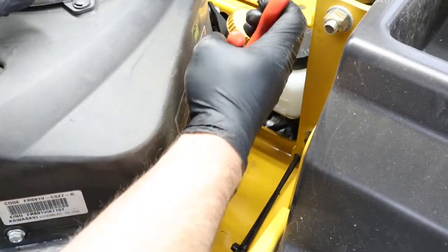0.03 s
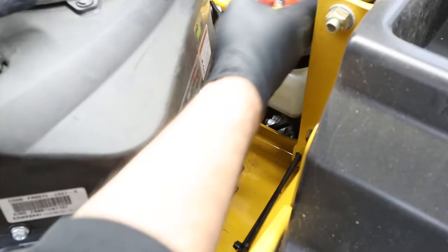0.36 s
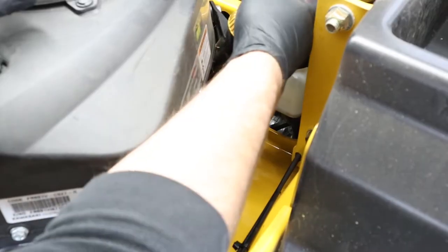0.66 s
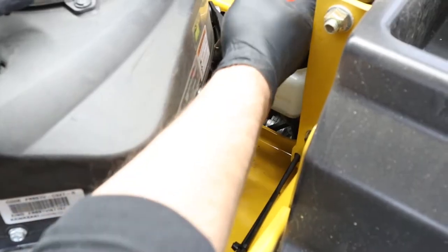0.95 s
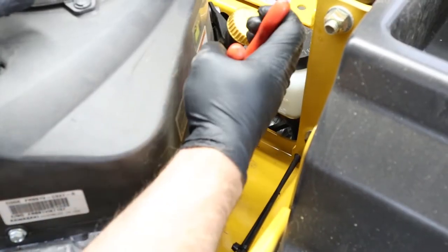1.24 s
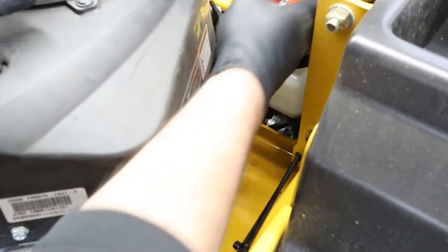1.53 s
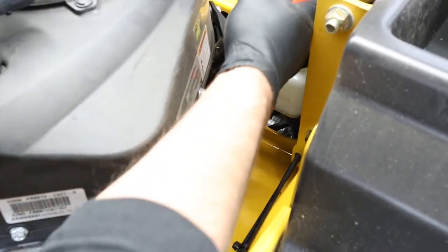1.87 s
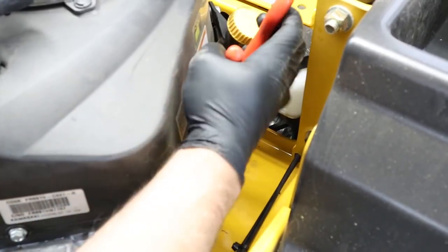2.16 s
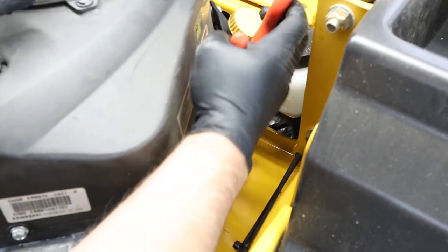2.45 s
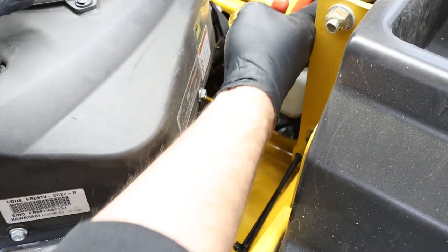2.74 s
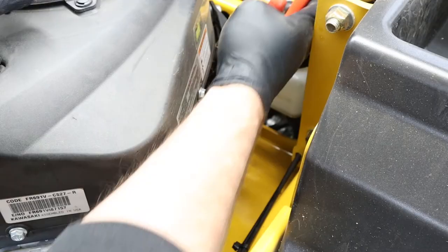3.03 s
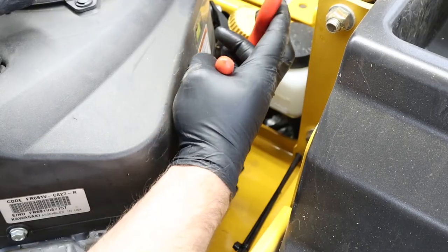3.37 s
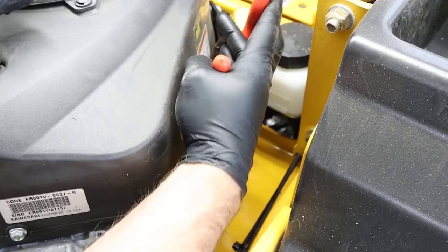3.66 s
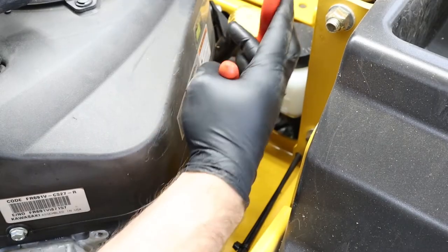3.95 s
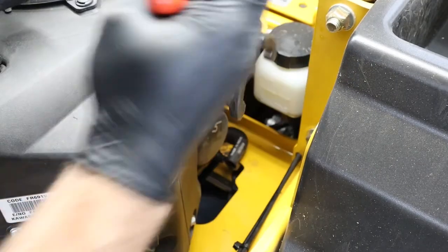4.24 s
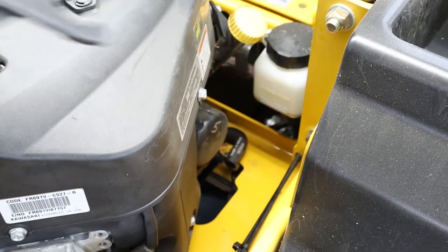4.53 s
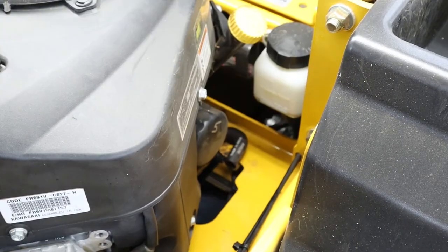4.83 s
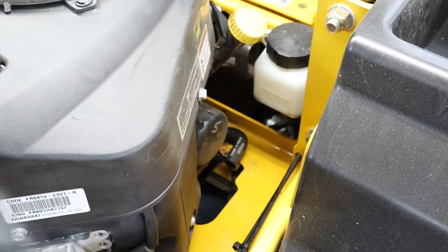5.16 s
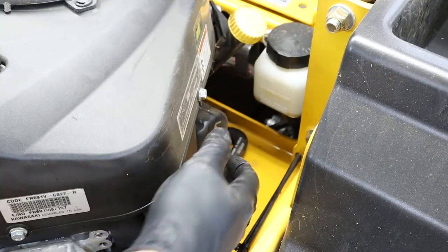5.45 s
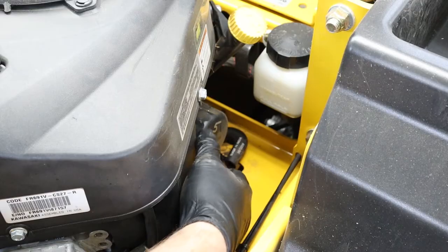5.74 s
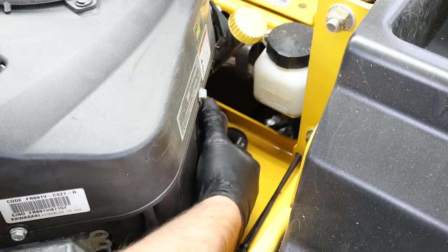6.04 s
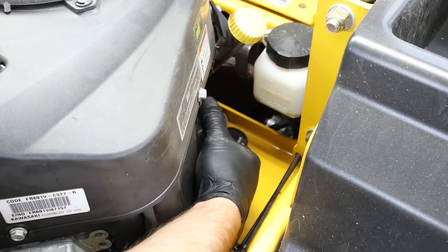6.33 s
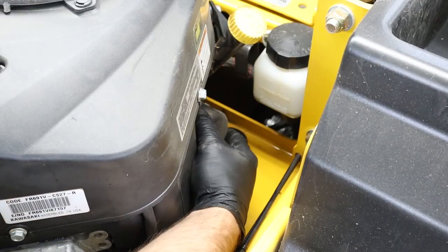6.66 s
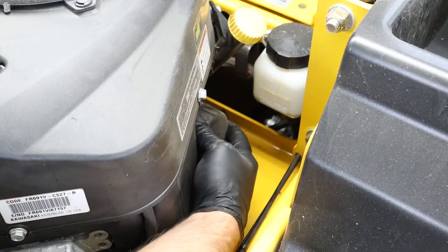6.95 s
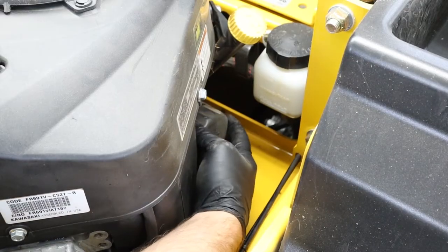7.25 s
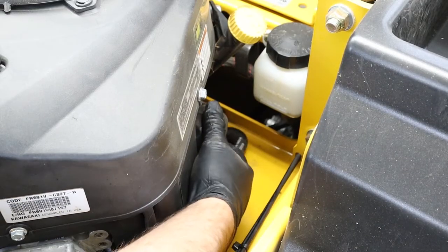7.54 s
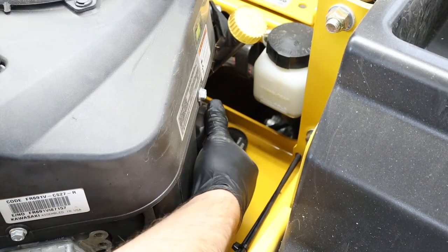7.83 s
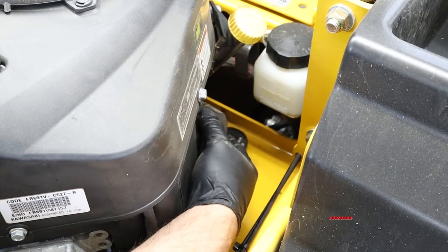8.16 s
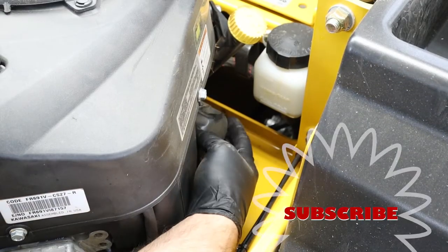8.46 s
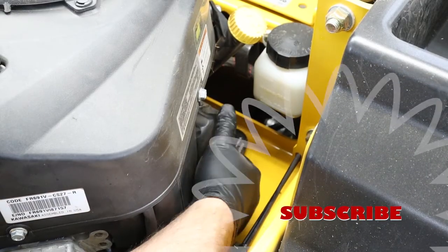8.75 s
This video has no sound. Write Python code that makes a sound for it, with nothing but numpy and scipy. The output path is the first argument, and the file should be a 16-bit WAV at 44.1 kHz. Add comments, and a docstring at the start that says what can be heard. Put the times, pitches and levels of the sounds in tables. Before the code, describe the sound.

Short metal squeaks and dull knocks of pliers loosening an oil filter, followed by a sharp clink and a distant crash.

```python
"""Oil filter pliers work a filter loose deep in an engine bay. For the first 3 s the jaws squeal on the
can by stick-slip, knock as they let go, and the can rubs round on its seal. From 4 s a gloved hand
brushes the parts and turns the filter on; near 5 s the pliers are put down with a clink. Near 7 s
something topples and crashes farther off in the workshop. Room air and a faint fan run throughout."""
import sys
import numpy as np
from scipy import signal
from scipy.fft import rfft, irfft, next_fast_len
from scipy.io import wavfile

SR = 44100
rng = np.random.default_rng(int(sys.argv[2]) if len(sys.argv) > 2 else 0)


def dump(signal):
    """Clip the signal to [-1, 1] and save it as 16-bit WAV at the path in sys.argv[1]."""
    limited = np.clip(np.atleast_2d(signal).T, -1, 1)
    pcm = np.round(limited * 32767).astype(np.int16)
    wavfile.write(sys.argv[1], SR, pcm)


N = 396589
TIME_S = np.arange(N) / SR
CUTOFF_HZ = 15800

# Jaw slips. Each row: start and length in seconds, first and last pitch in Hz, bend (above 0 glides
# early, below 0 late), mid-slip level in dB, swell in dB, octave over fundamental in dB, rasp 0-1.
JAW_SLIPS = [(0, .06, 4643, 5514, -0.1, -67, -3, -14.5, 0.23),
             (0.013, 0.0627, 3926, 4806, -2, -62.5, -3.5, -18, 0.68),
             (1.122, 0.052, 3523, 5050, -1.1, -63.5, 8.5, -13.5, 0.42),
             (1.173, 0.0624, 2695, 2118, 7, -38, 5, -14, .39),
             (2.059, 0.0222, 3300, 3800, -1.24, -68, 6.5, -12.5, 0.52),
             (2.081, .079, 1478, 1978, 0.3, -53, 1, 6, 0.74),
             (2.163, 0.0133, 2090, 2048, 1.5, -36.5, 0.5, -20, 0.19),
             (3.144, 0.0644, 1880, 3683, -1.19, -51, 2.5, -13.5, 0.66),
             (3.167, 0.0262, 3665, 3287, 3.5, -55, 0, -14, .7),
             (3.22, 0.0494, 4500, 5117, 6, -60.5, -14.5, -11, 0.49),
             (6.588, 0.0204, 3547, 5388, -1.5, -64, -2.5, -13, 0.85)]
# Knocks and taps on the filter. Each row: start in seconds, level in dB, pitch in Hz.
CAN_KNOCKS = [(.068, -40, 734.6), (.43, -44.5, 567), (.604, -52.5, 1546), (.607, -46, 187.6),
              (.944, -42, 272), (.963, -43, 340.5), (1.222, -33.5, 717), (1.569, -53.5, 1170),
              (1.599, -48, 542), (1.758, -52, 1267), (1.926, -61.5, 1830), (2.031, -57, 1330),
              (2.115, -50.5, 727), (2.163, -38.5, 606), (2.611, -48.5, 517), (2.657, -51.5, 797),
              (2.680, -42, 537.6), (2.713, -41.5, 550), (3.026, -64.5, 2320), (3.198, -53.5, 715),
              (3.995, -49, 1005), (4.268, -66, 2960), (5.629, -61.5, 900), (5.889, -56.5, 2930),
              (5.96, -54, 2700), (5.982, -58, 3600), (6.407, -64, 2140), (8.87, -52.5, 378)]
# Pliers touching metal. Each row: start in seconds, level in dB, tilt in dB per octave, low edge in Hz,
# crack in dB, free ring in dB, contact note in Hz, delay of the first bounce in seconds.
PLIERS_CLINKS = [(2.773, -44.5, 4, 298, -2.5, -17, 3135, .004),
                 (3.995, -49, -10, 430, -0.5, -19.5, 2267, .007),
                 (4.897, -40.5, 0, 900, -8.5, -20.5, 3106, .002),
                 (5.058, -26.5, 0, 700, -2, -4.5, 2191, .009)]
# Pulls of the can on its seal. Each row: start in seconds, length in seconds, level in dB.
SEAL_PULLS = [(0.372, .15, -59.5), (0.926, 0.063, -62), (1.563, 0.1087, -61), (2.107, 0.041, -62),
              (2.587, 0.034, -62), (2.71, 0.0847, -56.5), (3.183, 0.096, -63)]
# Glove brushes. Each row: centre in seconds, half length in seconds, level in dB.
GLOVE_BRUSHES = [(4.303, 0.035, -77.5), (4.525, 0.052, -77.5), (4.802, 0.152, -71.5), (5.063, 0.121, -67),
                 (5.491, .11, -77), (5.88, 0.205, -72.5), (7.564, 0.0703, -66), (8.2, 0.121, -75)]
# Hits of the falling object. Each row: start in seconds, level in dB, low edge in Hz, cut-off in Hz.
FALL_HITS = [(6.781, -40.5, 100.8, 1440), (6.896, -33, 909, 5700), (7.048, -32, 300, 900),
             (7.056, -24, 150, 12000), (7.073, -22.5, 90, 2200)]
# Modes of the pliers and the falling object. Each row: frequency in Hz, level in dB, T60 in seconds.
PLIERS_MODES = [(767, -13, 0.083), (1039, -19.5, 0.1), (1551, -19.5, .06), (2191, 2, 0.0937),
                (2190, -12.5, 0.029), (3155, -4, 0.18), (3180.8, 3.5, 0.076), (5137, -13.5, 0.039),
                (6232, -10, 0.055), (7480, 1, 0.0155), (8564, -1.5, 0.041), (9740, -12.5, 0.042)]
FALL_MODES = [(126, -26.5, 1), (173.86, -8, 1), (402.7, 9.5, 0.161), (574.2, -1, 0.59), (765, -6, 0.12),
              (880, -6.5, 0.8), (999, -8.5, 0.828), (1595.6, -1.5, 0.48), (2150.4, -1.5, 0.64),
              (2314, 2, 0.4), (2667, -15, 1), (2948, -12, .45)]
# Noise spectra of the sources. Each row: frequency in Hz, relative spectral density in dB.
GRIT_SPECTRUM = [(1200, -31), (2600, 3.5), (5000, -5), (15000, -17.5)]
CAN_SPECTRUM = [(40, -67), (70, -10), (130, -6), (400, -5), (600, -1), (1200, -7.5), (2500, -10.5),
                (6000, -13.5), (15000, -22.5)]
STEEL_SPECTRUM = [(200, -28.5), (600, -21), (1500, -9.5), (2200, 10.5), (3200, 2), (5000, 3), (9000, -10.5),
                  (12000, -10.5), (16000, -27)]
SEAL_SPECTRUM = [(100, -12.5), (230, -7), (350, 4), (550, 0.5), (800, -8.5), (1400, -12), (3000, -17.5),
                 (14000, -47)]
GLOVE_SPECTRUM = [(800, -25), (2500, 9.5), (5000, -4.5), (9000, -9.5), (16000, -16.5)]
CRASH_SPECTRUM = [(50, -37.5), (85, -38), (120, 13), (220, -0.5), (380, 2.5), (800, 5.5), (1800, 1),
                  (2700, 6), (4500, -4.5), (9000, -14), (15000, -30)]
AIR_SPECTRUM = [(20, -48), (45, -15.5), (72, 1), (110, -2.5), (240, -5), (400, -11), (700, -13),
                (1300, -18), (2100, -16), (2700, -21), (4000, -34.5), (8000, -41), (12000, -39),
                (16000, -59)]
# Workshop reverberation. Each row: frequency in Hz, T60 in seconds.
WORKSHOP_DECAY = [(60, 0.98), (200, 0.995), (500, 0.654), (2200, 0.8216), (4000, 0.6257), (8000, 0.32),
                  (15000, 0.29)]
# Hum of a distant fan. Each row: frequency in Hz, rms level in dB.
FAN_TONES = [(323, -80.5), (985, -89)]


def squeals(jitter=.06, flutter_db=4.5, overtone_fall_db=10, grit_db=-5.5, tooth_db=-1.5,
            tooth_ratio=1.26, sag_octaves_per_s=1.9, bite_share=.483):
    """Stick-slip of steel on steel: a gliding tone that grows uneven and gritty as the jaws bite."""
    out, t = np.zeros(N), TIME_S[:SR // 5]
    for start_s, length_s, first_hz, last_hz, bend, db, swell_db, octave_db, top_rasp in JAW_SLIPS:
        progress = np.minimum(t / length_s, 1)
        glide = np.expm1(-bend * progress) / np.expm1(-bend)
        sag = 2 ** (-sag_octaves_per_s * np.maximum(t - length_s, 0))
        hz = first_hz * (last_hz / first_hz) ** glide * sag
        rasp = top_rasp * np.minimum(progress / bite_share, 1)
        uneven_hz = hz * (1 + jitter * rasp * wander(1102, len(t)))
        phase = 2 * np.pi * np.cumsum(uneven_hz) / SR
        tone = np.sin(phase)
        for k in range(2, 8):
            overtone_db = octave_db - overtone_fall_db * (k - 2) ** .63
            flicker_db = flutter_db * wander(149.1, len(t)) / 2
            tone += amp(overtone_db + flicker_db) * np.sin(k * phase) * (k * hz < CUTOFF_HZ)
        # a second tooth catches and sings at its own pitch
        tooth_hz = hz * tooth_ratio * (1 + 2 * jitter * wander(250, len(t)))
        tooth = amp(tooth_db) * np.sin(2 * np.pi * np.cumsum(tooth_hz) / SR)
        grit = amp(grit_db) * noise(GRIT_SPECTRUM, len(t))
        squeal = np.sqrt(2) * tone + rasp * np.hypot(1, amp(octave_db)) * (tooth + grit)
        level_db = db + swell_db * (progress - .5) + flutter_db * rasp * wander(500, len(t))
        envelope = gate(t, length_s, attack_s=.006, release_t60_s=.03)
        add(out, start_s, amp(level_db) * envelope * squeal)
    return out


def knocks(note_db=-2, clatter_db=-2.5, t60_s=.0605, boom_hz=68, boom_db=-20.5, boom_t60_s=1.1):
    """The oil-filled can is heavily damped: one broad note among short modes. Big panels boom on."""
    out, t = np.zeros(N), TIME_S[:SR]
    boom = amp(boom_db) * np.sin(2 * np.pi * boom_hz * t) * fade(t, boom_t60_s) * (1 - fade(t, .23))
    for start_s, db, hz in CAN_KNOCKS:
        contact_hz = 2.227 * hz   # harder contacts ring higher
        clatter = unit(cut(noise(CAN_SPECTRUM, len(t)), contact_hz, "low"))
        note = np.sqrt(2) * np.sin(2 * np.pi * hz * t) * fade(t, 50 / hz)
        onset = np.sin(np.pi / 2 * np.minimum(t * contact_hz / 2, 1)) ** 2
        can = (amp(clatter_db) * clatter + amp(note_db) * note) * fade(t, t60_s) * onset
        panels = boom * np.sqrt(700 / hz)   # dull, heavy knocks shake them most
        add(out, start_s, amp(db) * (can + panels))
    return out


def clinks(note_db=-2, note_t60_s=.052, crack_t60_s=.0534, loss_db=2.5, dulling_db_per_octave=1.65):
    """Bouncing steel contacts: a crack, the note of the struck spot and the free ring of the pliers."""
    out, t = np.zeros(N), TIME_S[:SR // 3]
    octaves = np.log2(np.clip(np.fft.rfftfreq(len(t), 1 / SR), 500, 9000) / 3000)
    for start_s, db, tilt_db_per_octave, low_hz, crack_db, ring_db, note_hz, bounce_s in PLIERS_CLINKS:
        for bounce in range(3):
            crack = amp(crack_db) * noise(STEEL_SPECTRUM, len(t)) * fade(t, crack_t60_s)
            tool = amp(ring_db) * ring(PLIERS_MODES, t)
            note = ring([(note_hz, note_db, note_t60_s)], t)
            tilt = amp((tilt_db_per_octave - dulling_db_per_octave * bounce) * octaves)
            hit = irfft(rfft(crack + tool + note) * tilt, len(t))
            hit *= (1 - fade(t, .004)) * (1 - t / t[-1])
            hit = cut(hit, low_hz, "high", order=4)
            add(out, start_s + bounce_s * bounce ** 1.3, amp(db - loss_db * bounce ** 2) * hit)
    return out


def seal(attack_s=.017, release_t60_s=.512, creep_db=-77, grip_s=2.9):
    """The can rubs on its seal at each pull and keeps creeping while the jaws hold it."""
    pulls = sum(amp(db) * gate(TIME_S - start_s, length_s, attack_s, release_t60_s)
                for start_s, length_s, db in SEAL_PULLS)
    creep = amp(creep_db) * gate(TIME_S, grip_s, attack_s, release_t60_s)
    rub = friction(SEAL_SPECTRUM, slips_per_s=310, spread_db=1.5, t60_s=.0472, smooth_gain=.54)
    return np.hypot(pulls, creep) * rub


def glove(fumble_db=-83, fumble_from_s=4):
    """A rubber glove brushes the parts in even swells over a faint, steady fumbling."""
    brushes = sum(amp(db) * np.exp(-((TIME_S - centre_s) / half_s) ** 2)
                  for centre_s, half_s, db in GLOVE_BRUSHES)
    fumble = amp(fumble_db) * (TIME_S > fumble_from_s)
    rub = friction(GLOVE_SPECTRUM, slips_per_s=550, spread_db=0, t60_s=.0041, smooth_gain=.59)
    return np.hypot(brushes, fumble) * rub


def fall(modes_db=-14.5, rattle_t60_s=.1321, room_db=-5):
    """Something tips, strikes an edge and lands: a rattle that fills the room, and longer panel notes."""
    rattle, notes, t = np.zeros(N), np.zeros(N), TIME_S[:SR]
    onset = 1 - fade(t, .002)
    for start_s, db, low_hz, contact_hz in FALL_HITS:
        burst = noise(CRASH_SPECTRUM, len(t)) * fade(t, rattle_t60_s)
        panel = amp(modes_db) * ring(FALL_MODES, t)
        for track, sound in (rattle, burst), (notes, panel):
            hit = cut(sound * onset, contact_hz, "low", order=3)
            add(track, start_s, amp(db) * cut(hit, low_hz, "high", order=1))
    return cut(rattle + amp(room_db) * workshop(rattle) + notes, 100, "high", order=6)


def air_pocket(x, hz=330.1, width_hz=3.5, db=9.5):
    """The air round the filter adds a hollow note."""
    resonance = signal.lfilter(*signal.iirpeak(hz, hz / width_hz, fs=SR), x)
    return x + amp(db) * resonance


def engine_bay(x, t60_s, echo_db):
    """Adds quick reflections between the tank and the frame."""
    t = TIME_S[:SR // 6]
    echoes = rng.standard_normal(len(t)) * fade(t, t60_s) * (t > .002)
    return x + amp(echo_db) * signal.fftconvolve(x, echoes / np.linalg.norm(echoes))[:N]


def workshop(x, delay_s=.002, build_s=.016):
    """Diffuse echoes of the hall, the treble dying first."""
    t, tail = TIME_S[:SR], np.zeros(SR)
    white, hz = rfft(rng.standard_normal(SR)), np.fft.rfftfreq(SR, 1 / SR)
    edges_hz = np.geomspace(30, 20000, 15)
    for low_hz, high_hz in zip(edges_hz, edges_hz[1:]):
        band = irfft(white * (hz >= low_hz) * (hz < high_hz), SR)
        tail += band * fade(t, at_hz(WORKSHOP_DECAY, np.sqrt(low_hz * high_hz)))
    tail *= np.clip((t - delay_s) / build_s, 0, 1)
    return signal.fftconvolve(x, tail / np.linalg.norm(tail))[:N]


def air_and_fan(air_db=-69, drift_rad=3.27):
    """Room air with a faint, unsteady fan hum."""
    hum = sum(amp(db) * np.sqrt(2) * np.sin(2 * np.pi * hz * TIME_S + drift_rad * wander(9.7, N))
              for hz, db in FAN_TONES)
    return amp(air_db) * noise(AIR_SPECTRUM, N) + hum


def friction(spectrum, slips_per_s, spread_db, t60_s, smooth_gain):
    """Tiny slips, each ringing one of four spots of the surface, over a smooth rub; rms 1."""
    slipping = rng.random(N) < slips_per_s / SR
    strength = amp(spread_db * np.minimum(rng.exponential(1, N), 3))
    slips = slipping * strength * rng.choice([-1, 1], N)
    t, grains = TIME_S[:SR // 10], np.zeros(N)
    for spot in range(4):
        grain = noise(spectrum, len(t)) * fade(t, t60_s) * (1 - fade(t, t60_s / 2))
        grains += signal.oaconvolve(slips * (np.arange(N) % 4 == spot), unit(grain))[:N]
    return unit(unit(grains) + smooth_gain * noise(spectrum, N))


def ring(modes, t):
    """A blow excites each mode with its own strength and phase."""
    return sum(rng.uniform(.8, 1.2) * amp(db) * fade(t, t60_s)
               * np.sin(2 * np.pi * (hz * t + rng.random())) for hz, db, t60_s in modes)


def noise(spectrum, size):
    """Coloured noise, rms 1."""
    n = next_fast_len(size)
    gain = amp(at_hz(spectrum, np.fft.rfftfreq(n, 1 / SR)))
    return unit(irfft(rfft(rng.standard_normal(n)) * gain, n)[:size])


def wander(hz, size):
    """Random drift with hz knots a second, spread 1."""
    knots = rng.standard_normal(size // 4 + 4)
    return np.interp(np.arange(size) * hz / SR, np.arange(len(knots)), knots) * np.sqrt(3 / 2)


def cut(x, hz, kind, order=2):
    """Butterworth low- or high-pass."""
    return signal.sosfilt(signal.butter(order, np.clip(hz, 10, .45 * SR), kind, fs=SR, output="sos"), x)


def gate(t, length_s, attack_s, release_t60_s):
    """Attack, hold and release from t = 0."""
    return np.clip(t / attack_s, 0, 1) * fade(np.maximum(t - length_s, 0), release_t60_s)


def fade(t, t60_s):
    """Exponential decay."""
    return amp(-60 * t / t60_s)


def amp(db):
    """Decibels to gain."""
    return 10 ** (np.asarray(db) / 20)


def unit(x):
    """Scale to rms 1."""
    return x / np.sqrt(np.mean(x ** 2) + 1e-20)


def at_hz(table, hz):
    """Read a table on a log-frequency axis."""
    table_hz, values = np.transpose(table)
    return np.interp(np.log(np.maximum(hz, 1)), np.log(table_hz), values)


def add(out, start_s, x):
    """Mix x in at start_s."""
    i = max(0, round(start_s * SR))
    out[i:i + len(x)] += x[:max(0, N - i)]


def scene():
    """Near work in the engine bay, the far fall and the room; mono."""
    squeal = engine_bay(squeals(), t60_s=.084, echo_db=-3.5)
    knock = engine_bay(air_pocket(knocks()), t60_s=.16, echo_db=-7)
    clink = clinks()
    to_room = amp(-13.5) * squeal + amp(-18) * knock + amp(-16.5) * clink
    return (squeal + knock + clink + fall() + seal() + glove() + workshop(to_room) + air_and_fan())[None]


def record(dry):
    """Steep elliptic low-pass."""
    return signal.sosfilt(signal.ellip(10, .1, 70, CUTOFF_HZ, fs=SR, output="sos"), dry)


dry = scene()
out = record(dry)
dump(out)
```